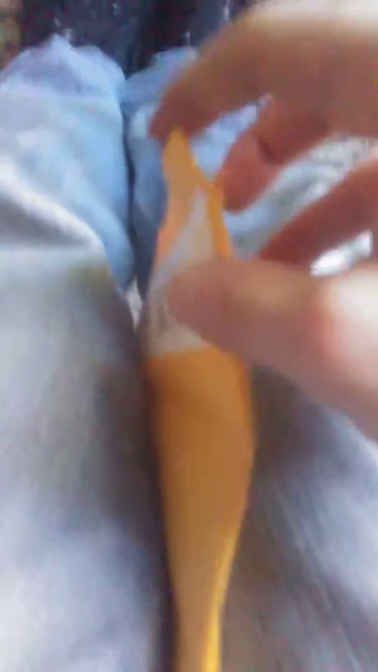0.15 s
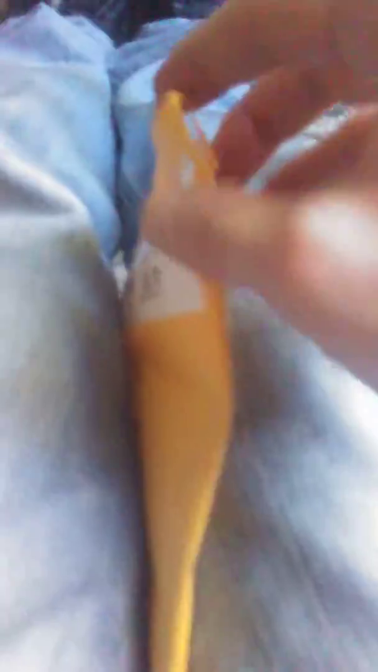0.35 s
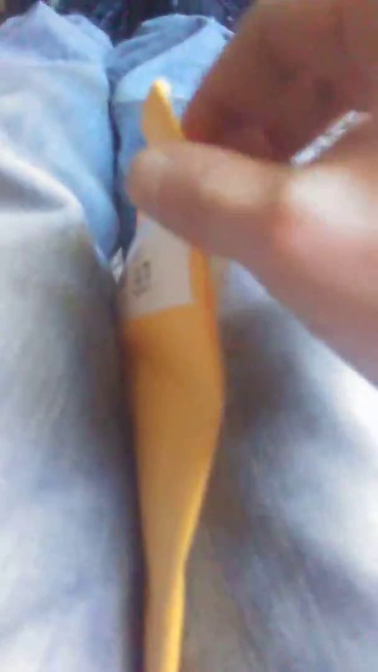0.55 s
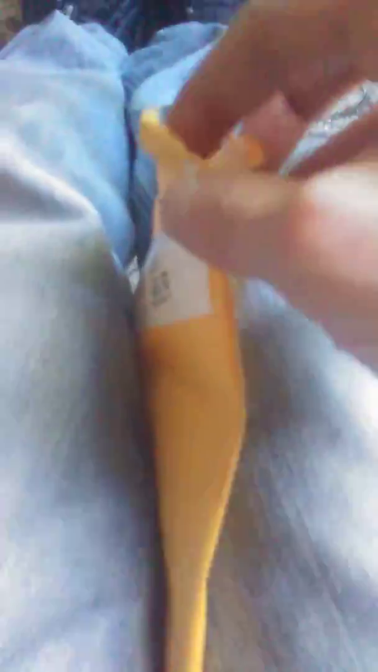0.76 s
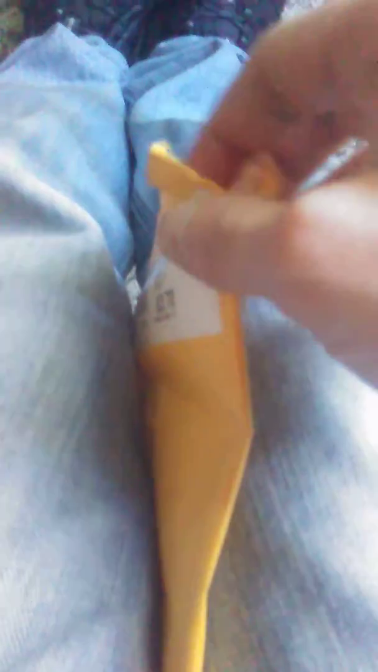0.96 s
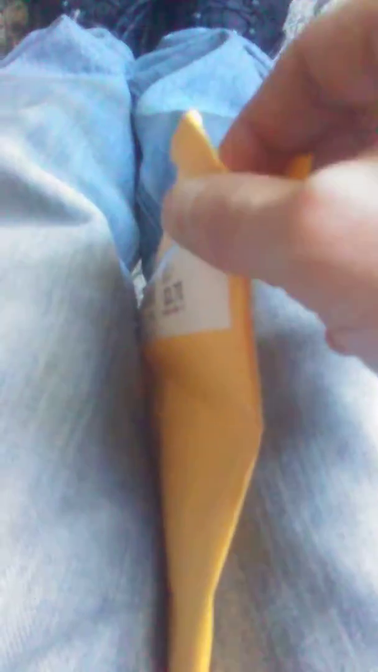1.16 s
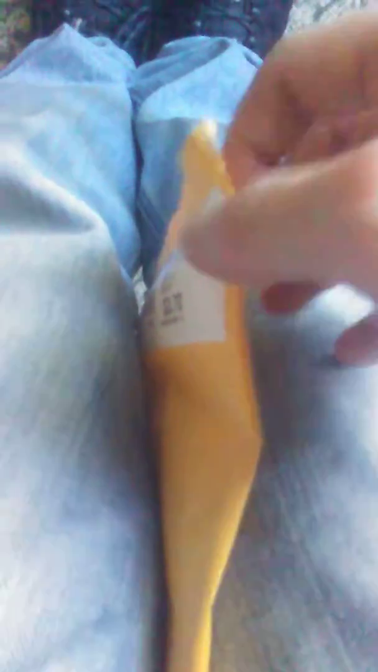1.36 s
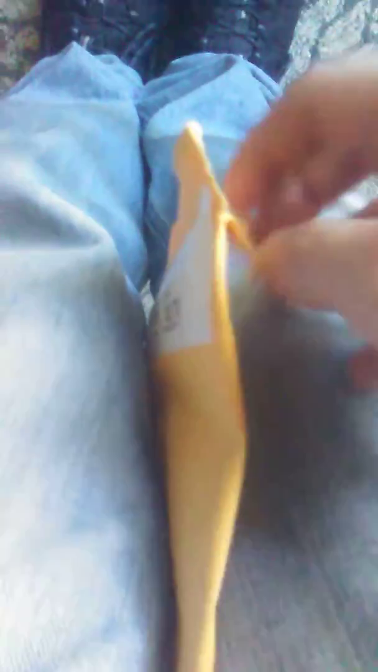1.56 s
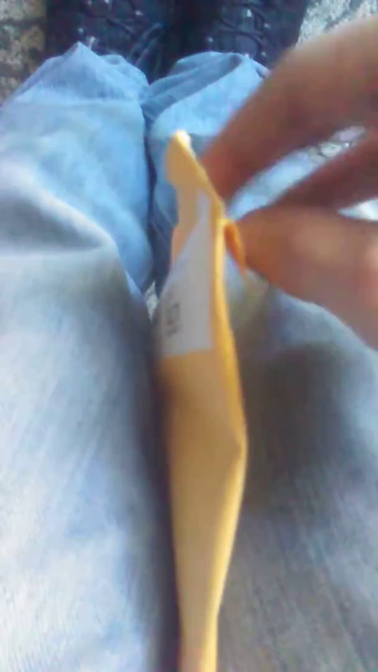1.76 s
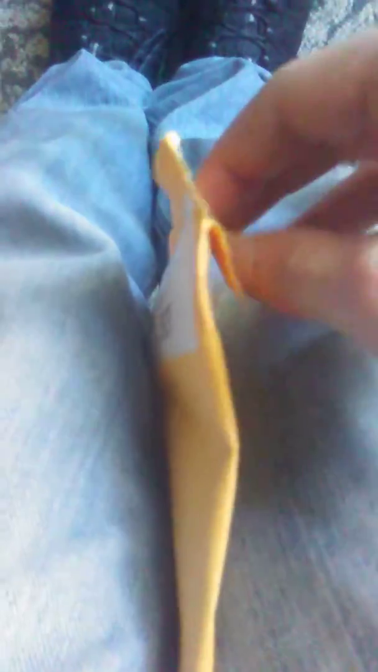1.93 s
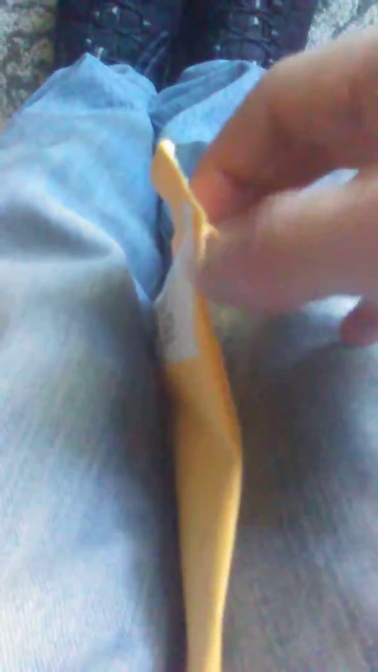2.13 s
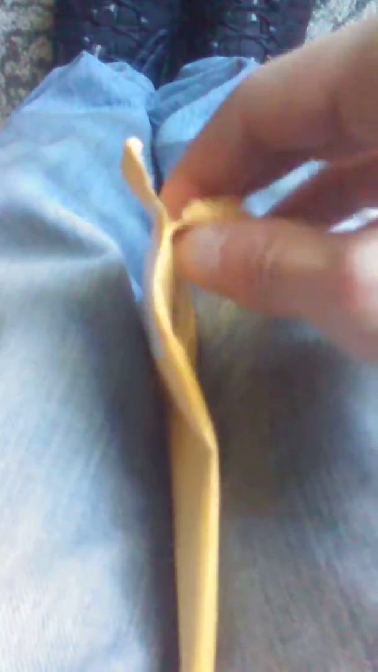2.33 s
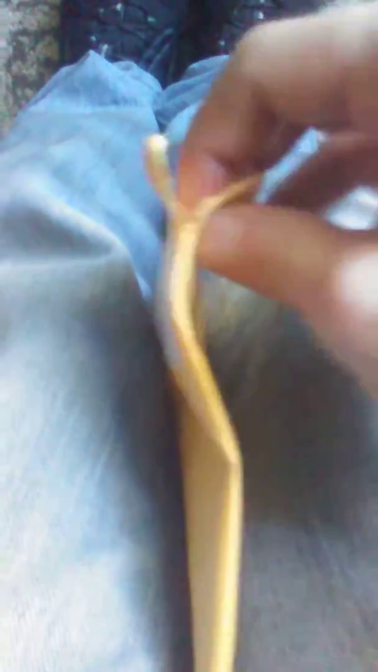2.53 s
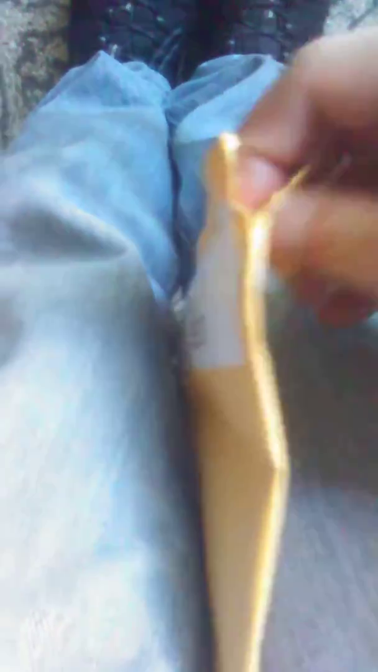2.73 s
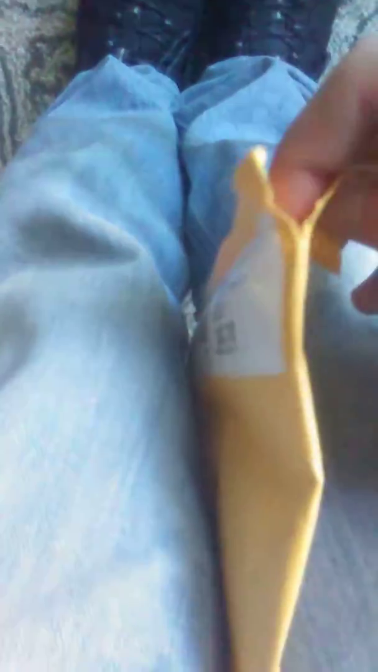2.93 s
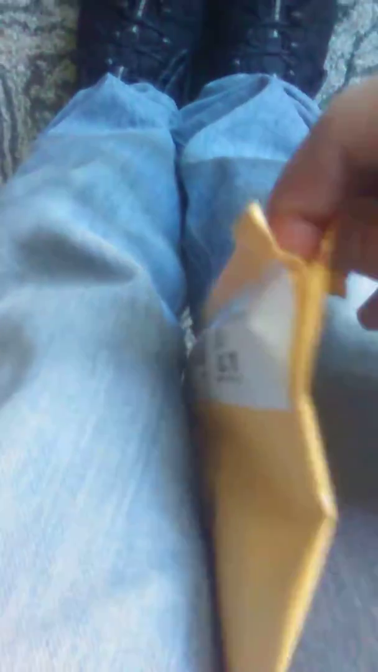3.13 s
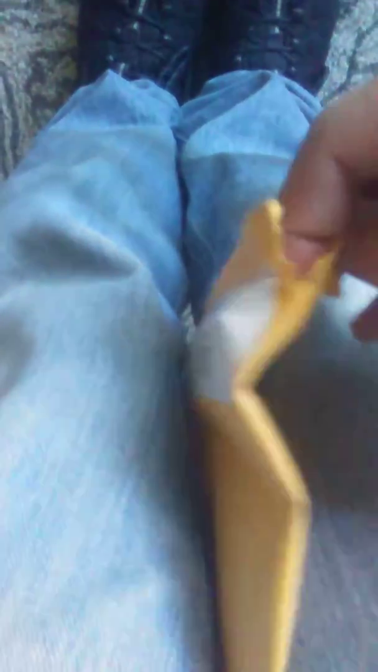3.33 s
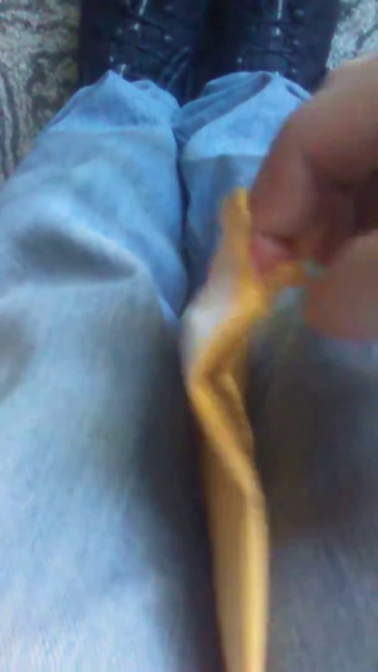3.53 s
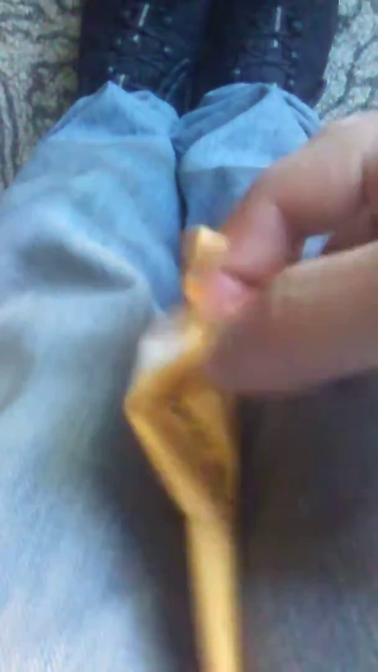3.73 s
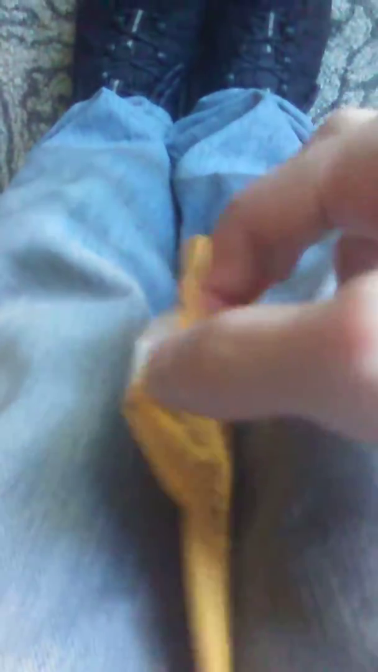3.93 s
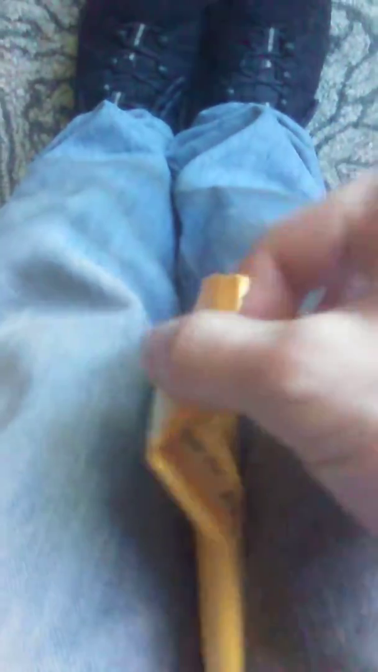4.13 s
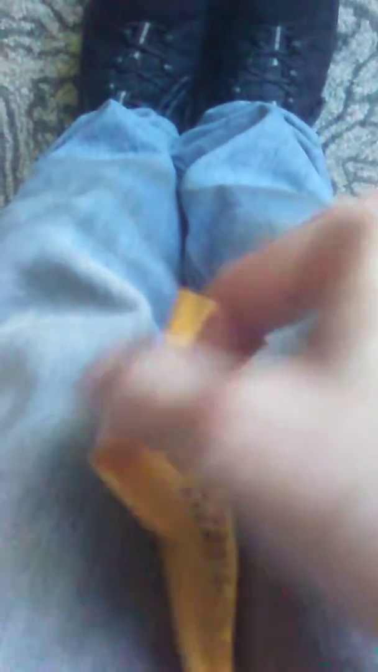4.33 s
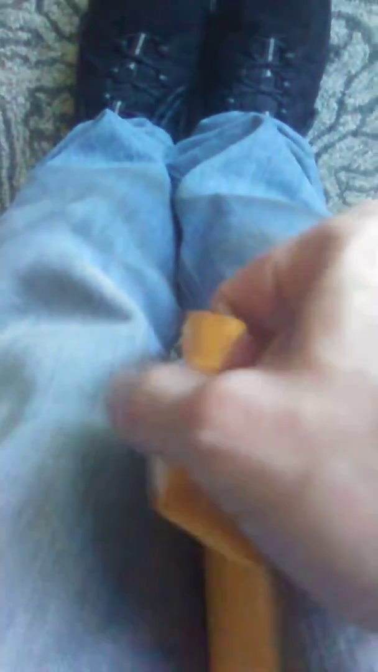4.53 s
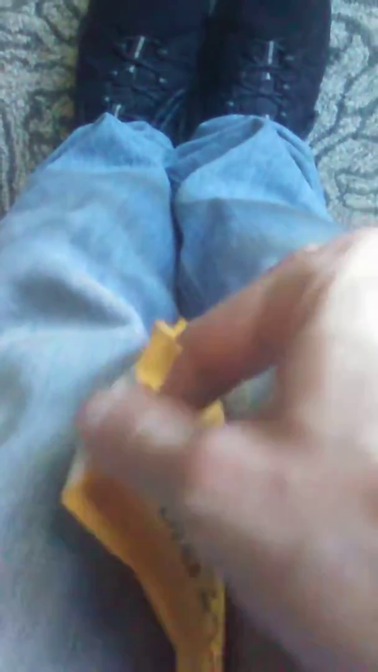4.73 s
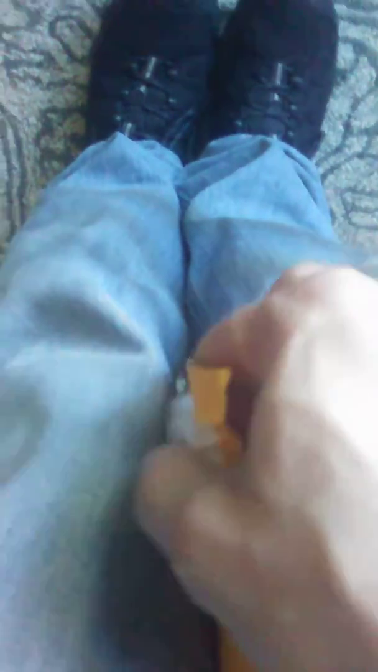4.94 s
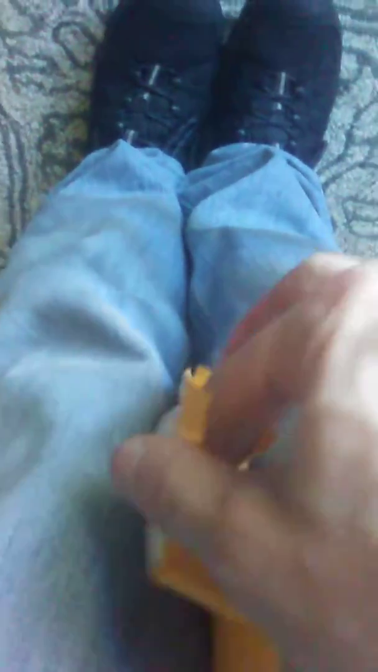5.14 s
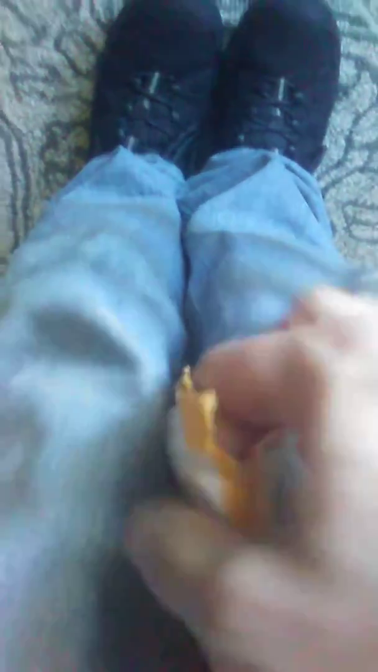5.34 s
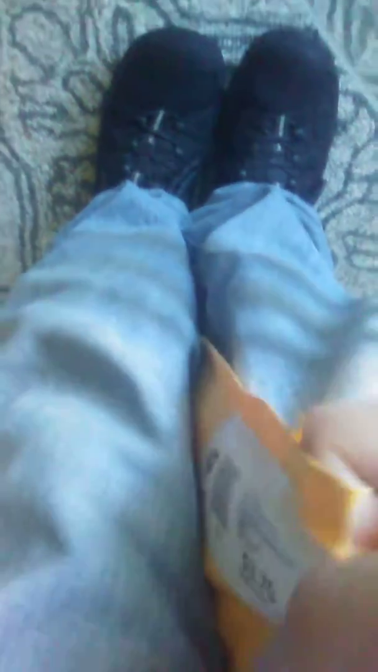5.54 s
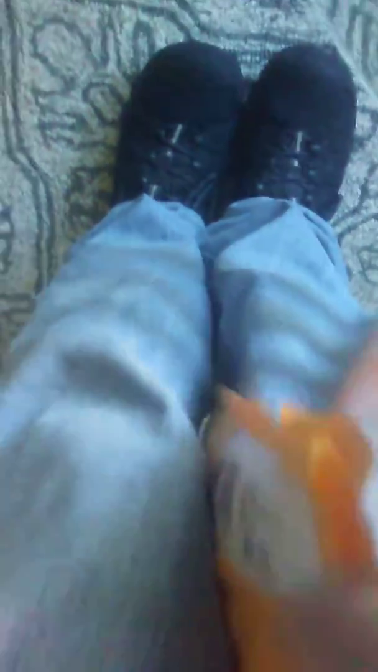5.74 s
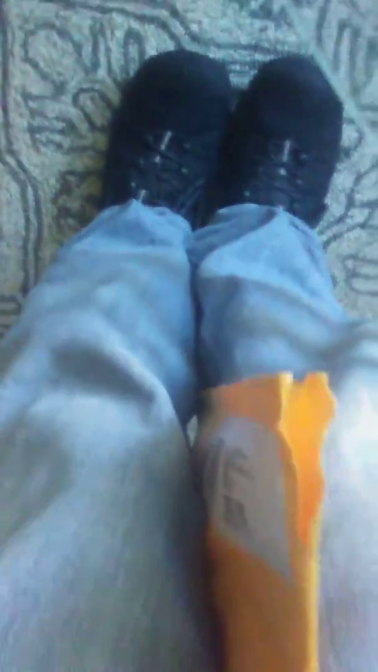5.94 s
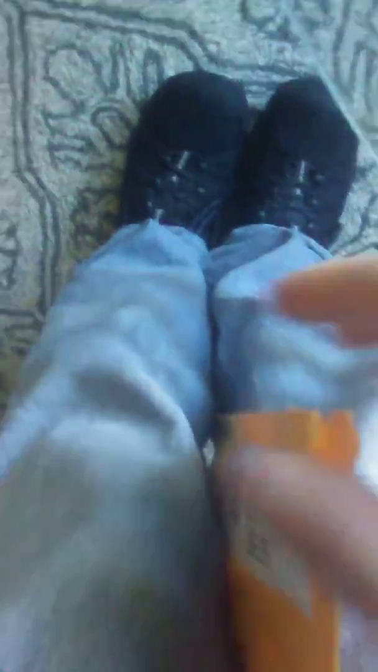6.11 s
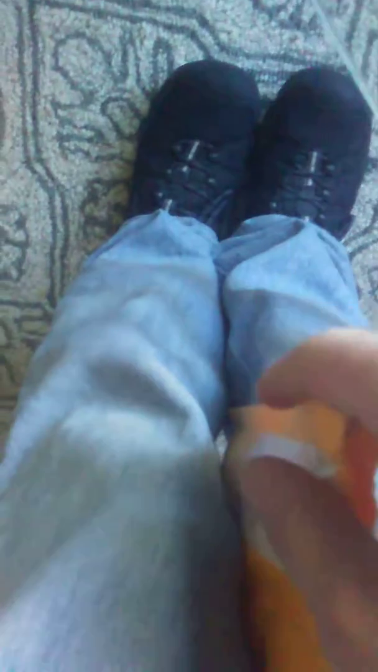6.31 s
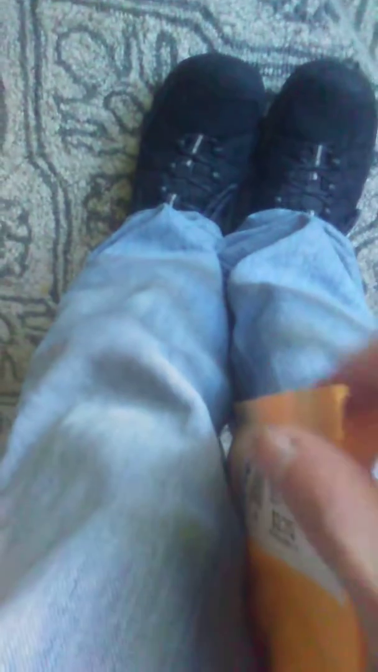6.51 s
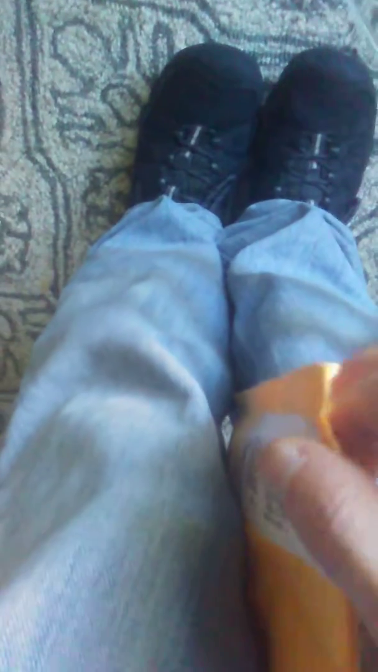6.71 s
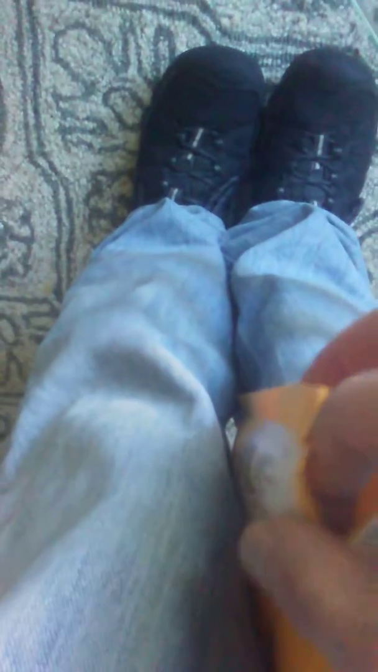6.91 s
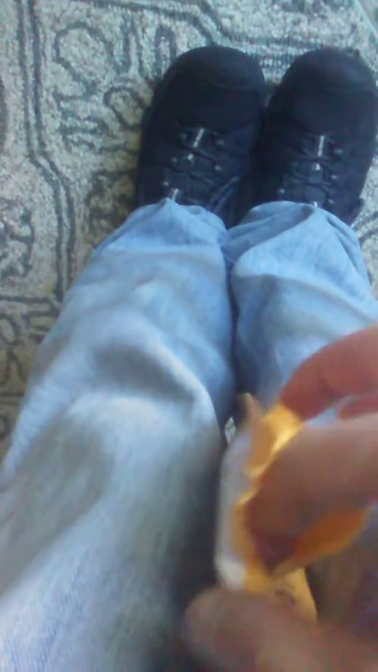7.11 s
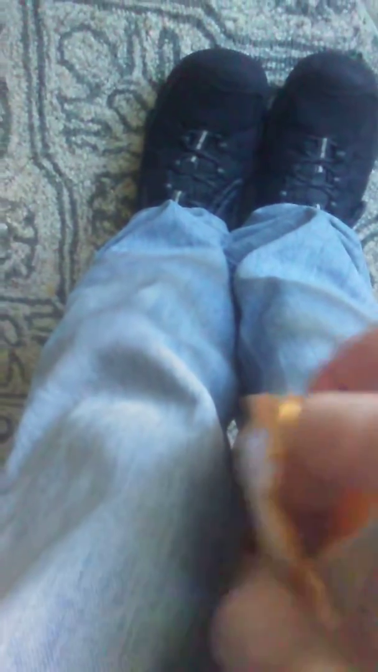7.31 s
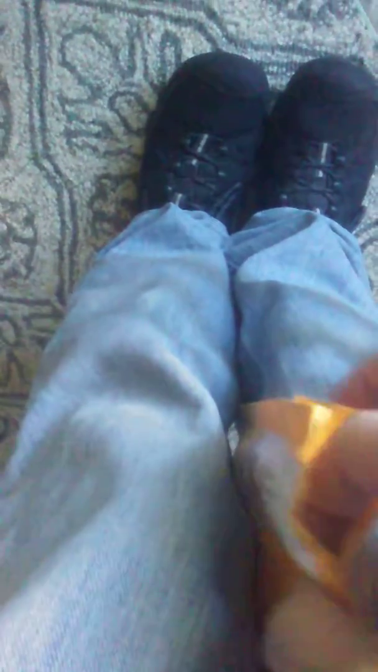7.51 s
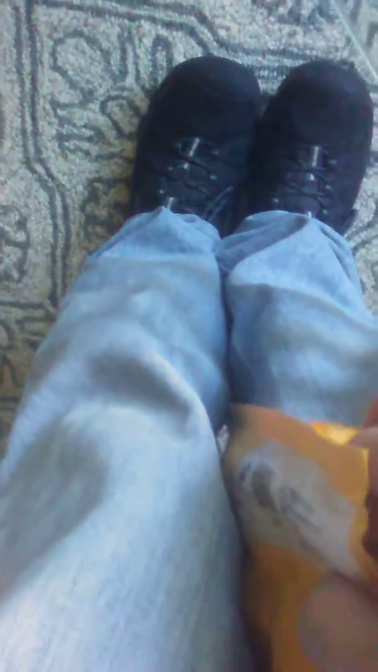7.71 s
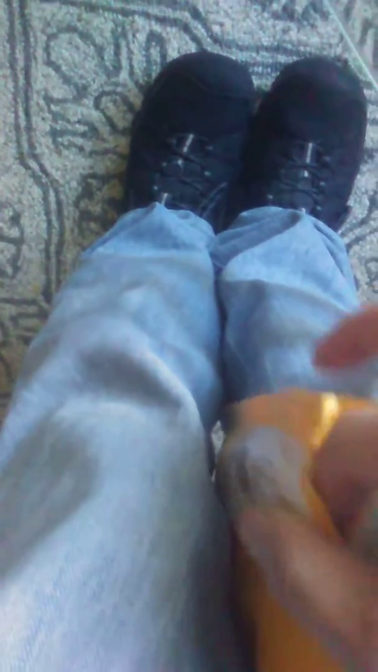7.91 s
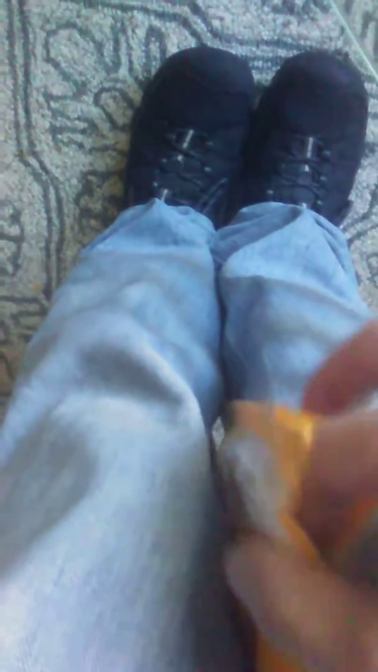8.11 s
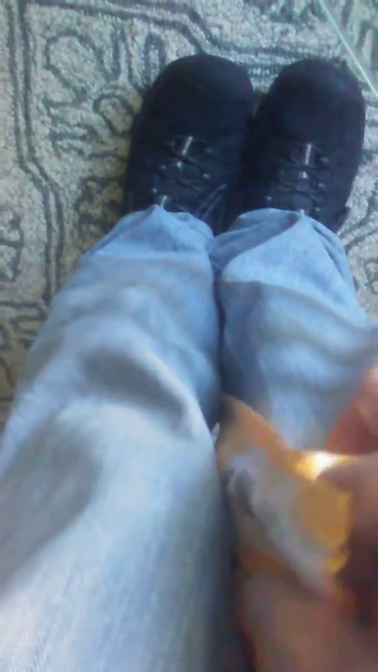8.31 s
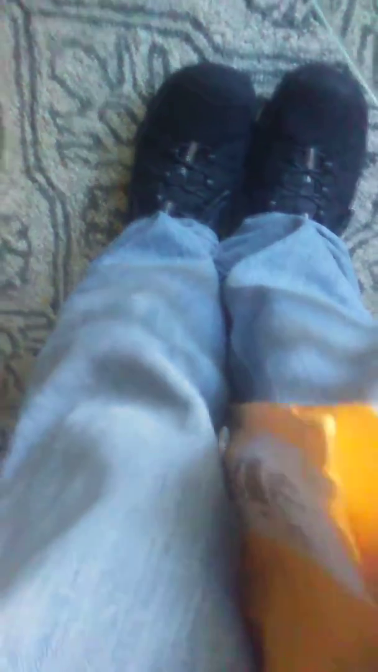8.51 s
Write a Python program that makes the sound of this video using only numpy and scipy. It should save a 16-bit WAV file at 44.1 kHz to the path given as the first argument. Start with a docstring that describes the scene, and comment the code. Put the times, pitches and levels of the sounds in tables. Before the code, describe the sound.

A stiff paper envelope is handled and torn close to a small microphone in a quiet small room with a faint steady noise floor. From 0 to 1.2 s there are only soft, short finger rubs and slight rustles. Around 1.2-1.5 s light clicks lead into a brighter crinkling burst, then it falls back to faint rasps and ticks until 2.2 s. Rubs strengthen to 2.9 s, and after a short dip, from 3.1 s the crackling becomes nearly continuous, with woody dry snaps clustering at 3.8-4.5 s. Rasping tears swell at 4.8 and 5.4 s, with sharp pops near 5.5 s. At 5.77 s one very hard snap overloads. It is almost quiet at 6.0-6.2 s, then smooth rubs follow, turning to crinkles and snaps from 6.8 s. Ripping strokes at 7.6 and 8.1 s lead to a final violent crack at 8.52 s.

```python
"""A paper mailing envelope is picked at by the flap, rubbed and torn open, close to a small microphone.
Each pull or rub of the fingers is a stroke: a rasp of tiny fibre breaks that starts quickly, holds and lets go,
with crinkles among the breaks, a fizz of treble above and the murmur of the hollow envelope below.
The stiff paper buckles in short snaps, each a pair of pitched rings with a brief crack; the hardest ones
overload the microphone. A quiet room adds faint reflections and a steady background noise."""
import sys
import numpy as np
from scipy import signal
from scipy.io import wavfile
from scipy.ndimage import uniform_filter1d

SR = 44100
rng = np.random.default_rng(int(sys.argv[2]) if len(sys.argv) > 2 else 0)


def to_wav(sig):
    """Store sig (one row per channel, or 1-D mono) as 16-bit WAV at the path in sys.argv[1].

    Samples outside -1..1 are clipped; the rate is SR.
    """
    pcm = np.clip(np.atleast_2d(sig), -1, 1) * 32767
    pcm = np.round(pcm).astype(np.int16)
    wavfile.write(sys.argv[1], SR, pcm.T)  # frames by channels


N = 377496
TIME = np.arange(N) / SR


def gain_of(db):
    """Decibels to amplitude."""
    return 10 ** (np.asarray(db) / 20)


def evened(x):
    """Scales to rms 1."""
    return x / np.sqrt(np.mean(x ** 2) + 1e-20)


def read(points, hz):
    """Reads a curve of (Hz, value) points on a log-frequency axis."""
    f, value = np.transpose(points)
    return np.interp(np.log(hz + 1), np.log(f), value)


def add(mix, start_s, sound):
    """Mixes a sound in at start_s seconds, cut off where the mix ends."""
    part = mix[max(round(start_s * SR), 0):][:len(sound)]
    part += sound[:len(part)]


def colour(x, points, size=4096):
    """Causal minimum-phase filter with the given spectrum, so that clicks keep their sharp front."""
    hz = abs(np.fft.fftfreq(size, 1 / SR))
    log_gain = np.log(gain_of(read(points, hz)))
    # the Hilbert transform of the log gain gives the phase
    taps = np.fft.ifft(np.exp(np.conj(signal.hilbert(log_gain)))).real
    return signal.oaconvolve(x, taps[:size // 2])[:len(x)]


def resonate(x, hz, q):
    """One damped resonance."""
    b, a = signal.iirpeak(hz, q, SR)
    return signal.lfilter(b, a, x)


def facet(hz, q, rise_s=0.0003, size=800):
    """A patch of paper flips over: its ringing builds in a moment and soon dies; energy 1."""
    t = TIME[:size]
    build = 1 - np.exp(-t / rise_s)
    decay = np.exp(-np.pi * hz * t / q)
    ring = np.sin(2 * np.pi * hz * t) * build * decay
    return ring / np.linalg.norm(ring)


def breaks(per_s, spread_db):
    """Fibres break at random: clicks of either sign, mostly small and a few large."""
    clicks = np.zeros(N)
    place, side, chance = rng.random((round(per_s * N / SR), 3)).T
    sizes = gain_of(-spread_db * np.log(chance + .03))  # the .03 limits the largest
    clicks[(place * N).astype(int)] = np.sign(side - .5) * sizes
    return clicks


def shift_colour(x, patchy_db, bright=0, size=512):
    """As the sheet bends its resonances wander; bright tilts the spectrum in dB per octave."""
    hz, t, z = signal.stft(x, SR, nperseg=size)
    # random gains, smoothed over neighbouring bands and moments
    blur = np.outer(np.hanning(7), np.hanning(11))
    patches = evened(signal.oaconvolve(rng.standard_normal(z.shape), blur, "same"))
    octaves = np.log2(np.clip(hz, 500, 5000) / 2000)[:, None]  # the tilt pivots at 2 kHz
    tilt_db = octaves * np.interp(t, TIME, bright * np.ones(N))
    z = z * gain_of(patchy_db * patches + tilt_db)
    return evened(signal.istft(z, nperseg=size)[1][:N])


def unevenness(surge, per_s, relax_s):
    """The paper sticks and gives way: each slip sets off a surge that dies away."""
    kicks = abs(breaks(per_s, spread_db=2.0))
    slips = signal.lfilter([1], [1, -np.exp(-1 / (relax_s * SR))], kicks)
    return evened(1 + surge * evened(slips))


def crinkles(per_s, spread_db, q, low_hz, high_hz, count=24):
    """Many small facets of different pitch buckle at random."""
    total = np.zeros(N)
    for hz in np.linspace(low_hz, high_hz, count):
        total += signal.oaconvolve(breaks(per_s / count, spread_db), facet(hz, q))[:N]
    return evened(total)


def strokes():
    """Each stroke grips fast and lets go exponentially; overlaps add in power and average tilt and crinkling."""
    # Pulls and rubs of the fingers. Each row: start in seconds, length in seconds, rasp level in dB,
    # swell from start to end in dB, fizz and hollow body in dB relative to the rasp,
    # brightness in dB per octave, crinkling in dB relative to the sliding rasp.
    # Levels are ahead of the trims in tearing().
    stroke_table = [(0.01, 0.0075, -45.5, -10, -18.5, -8.5, -3, -12),
                    (0.045, 0.038, -60.5, -2, -16, -3, -2, 5), (0.128, 0.12, -66, -1, -11.5, -0.5, -2, 6),
                    (0.33, 0.044, -62, -11, -14, -2, -3, -4), (0.368, 0.062, -56.5, -3, -13, -7, -4, -5.5),
                    (0.456, 0.041, -56.5, 3, -16.5, -16, -6, -12),
                    (0.608, 0.023, -53.5, -11, -11, -18, -4, -11),
                    (0.691, 0.14, -51, 1, -13.5, -12.5, -2, -13),
                    (0.898, 0.077, -55.5, 0, -12.5, -7, 0, -15), (0.991, 0.037, -55, 5, -11, -3, -2, -12),
                    (1.018, 0.055, -49, -2.5, -10.5, -6.5, -1, -10), (1.215, 0.1, -62, -8, -14, 2, -4, -7),
                    (1.362, 0.062, -53.5, -3, -14, -6.5, 0, -7), (1.411, 0.03, -41.5, -2, -9.5, -3, 1, -8),
                    (1.44, 0.012, -38.5, -2, -3.5, -18, 9, -1),
                    (1.477, 0.044, -40, -0.5, -8.5, -17, -1, -3.5),
                    (1.525, 0.15, -49.5, 0, -9.5, -9.5, -1, -7), (1.705, 0.024, -49.5, -10, -11, -7, 0, 2),
                    (1.823, 0.029, -57, 10, -7, -7, -1, -6), (1.922, 0.19, -70.5, -4, -12, -0.5, -3, 7),
                    (2.113, 0.025, -55, -1, -7, -4, 0.5, -5), (2.165, 0.065, -69, 20.5, -11, 5, 4, 6),
                    (2.257, 0.082, -46, 5.5, -10.5, -22, 0, -6), (2.338, 0.13, -53, 0, -8, -6, -1, -6.5),
                    (2.512, 0.076, -49.5, 3.5, -14, -14, -2, -9),
                    (2.608, 0.079, -55.5, 3, -12, -10, -1, 2.5), (2.698, 0.083, -48, 15, -12, -14, 5.5, -6),
                    (2.778, 0.11, -46, -3.5, -11.5, -14, 1, -3), (2.982, 0.14, -65, 1.5, -16, 6, 0, 1.5),
                    (3.115, 0.091, -53, -11, -13, -7.5, 4, -3),
                    (3.181, 0.089, -43.5, 9, -9.5, -7, -1.5, -1),
                    (3.287, 0.21, -46.5, 5.5, -9.5, -7.5, 4, -1.5),
                    (3.51, 0.24, -49, 3, -11.5, -10, 1, -3.5),
                    (3.751, 0.053, -42.5, 11.5, -11, -14, 2, -4.5),
                    (3.822, 0.13, -46, 2, -11, -10.5, 2.5, -0.5),
                    (3.987, 0.1, -44.5, 8.5, -9.5, -11.5, 3, -1.5),
                    (4.112, 0.16, -48, 9, -11.5, -8, -4, -8.5),
                    (4.286, 0.18, -42.5, 7.5, -11, -15, -1, -1.5),
                    (4.464, 0.094, -46, 0.5, -9, -12.5, 4, 0),
                    (4.617, 0.048, -43.5, 10, -12.5, -16, -2.5, -8),
                    (4.67, 0.19, -46.5, 5.5, -10.5, -19, -1.5, -7.5),
                    (4.823, 0.085, -36.5, 5, -12, -18, -0.5, -6),
                    (4.917, 0.1, -47.5, -3, -8.5, -7.5, 1, -3), (5.033, 0.14, -51.5, 3, -11, -7, -3.5, -9),
                    (5.105, 0.11, -43.5, 6.5, -12, -13.5, -1.5, -1.5),
                    (5.22, 0.17, -43.5, 13, -10, -13, -1, -7), (5.392, 0.15, -37, 0, -8, -11, 1.5, -8),
                    (5.556, 0.22, -47.5, -5.5, -7.5, -16, -2, -5.5),
                    (5.757, 0.064, -37, -14.5, -16, -7.5, 1.5, -3.5),
                    (5.82, 0.078, -51, -8.5, -7, -23, 1.5, -7.5),
                    (5.901, 0.12, -52.5, -1, -7, -1.5, 4.5, -2.5),
                    (6.035, 0.066, -64.5, -9.5, -7, -7, 3, 1), (6.118, 0.04, -60, 2.5, -6, -3.5, 7, 3),
                    (6.262, 0.1, -44, -1, -14.5, -18.5, -1, -20.5),
                    (6.405, 0.11, -48, 3, -14, -16, -1.5, -19),
                    (6.529, 0.082, -48, -0.5, -13, -9.5, -2, -18),
                    (6.659, 0.068, -49.5, 1, -12.5, -10.5, 0.5, -10),
                    (6.743, 0.13, -48.5, 4, -8, -9.5, 1, -9), (6.832, 0.045, -42, -1, -9, -6.5, 3.5, -2.5),
                    (6.88, 0.15, -48.5, 0, -9.5, -8.5, 5, -3.5),
                    (6.958, 0.21, -44.5, 6.5, -9.5, -15.5, 5, -4.5),
                    (7.184, 0.046, -50, -2, -8.5, -10, 3, -19),
                    (7.239, 0.052, -42.5, -3, -14, -15.5, 0, -7.5),
                    (7.306, 0.073, -42, 4, -12.5, -13, 1.5, -7.5),
                    (7.386, 0.075, -44.5, -1, -8, -10.5, 2, -5), (7.477, 0.12, -48, 7, -9, -8.5, 2, 1.5),
                    (7.604, 0.13, -39, 2, -9.5, -19.5, 0.5, -3.5),
                    (7.746, 0.26, -46.5, 4.5, -9.5, -12, 0.5, -12),
                    (7.962, 0.16, -47.5, -1, -8.5, -16, 5.5, -5.5),
                    (8.13, 0.077, -37.5, 5.5, -11.5, -22, -0.5, -4.5),
                    (8.216, 0.13, -46.5, -5.5, -6, -13, 2, -5.5), (8.355, 0.13, -55, 2, -6.5, -9, 0, -2),
                    (8.444, 0.065, -44, 6, -10, -18, 4, -3), (8.522, 0.038, -36, 9, -6, -5, 5, -3)]
    # on release the sheet and the air in the envelope settle at nearly the same pace
    attack_s, release_s, body_release_s = 0.0032, 0.0087, 0.0089
    # the creases go on settling for a moment, louder the more the stroke crinkled (share: dB per dB)
    settling_db, settling_share, settling_s = -9, .35, 0.036
    # the held envelope never quite rests
    resting_db, resting_body_db = -82, -82

    rasp, fizz, body, bright, crinkle = np.zeros((5, N))
    for start, length, rasp_db, swell_db, fizz_db, body_db, tilt, crinkle_db in stroke_table:
        t = TIME[:int((length + .15) * SR)]  # room for the release
        after = np.maximum(t - length, 0)
        swell = swell_db * (np.minimum(t / length, 1) - .5)
        held = gain_of(rasp_db + swell) * np.minimum(t / attack_s, 1)
        settling = gain_of(settling_db + settling_share * crinkle_db) * np.exp(-after / settling_s)
        power = (held * np.maximum(np.exp(-after / release_s), settling)) ** 2
        add(rasp, start, power)
        add(fizz, start, power * gain_of(fizz_db) ** 2)
        add(body, start, (held * gain_of(body_db) * np.exp(-after / body_release_s)) ** 2)
        # weighted by power, so the loudest stroke decides
        add(bright, start, power * tilt)
        add(crinkle, start, power * crinkle_db)
    rasp = rasp + gain_of(resting_db) ** 2
    body = body + gain_of(resting_body_db) ** 2
    return np.sqrt(rasp), np.sqrt(fizz), np.sqrt(body), bright / rasp, gain_of(crinkle / rasp)


def tearing():
    """Dense fibre breaks rasp in the sheet, with crinkles among them, fizz above and the hollow body below."""
    # Spectra of the fibre rasp, the fizz and the hollow body.
    # Each row: frequency in Hz, relative density in dB per Hz.
    rasp_spectrum = [(120, -34.5), (300, -16), (550, -7.5), (850, -2), (1300, 0), (1650, -0.5), (2100, 4.5),
                     (2700, -2.5), (3800, -1), (4600, -23), (6500, -28.5), (10000, -44)]
    fizz_spectrum = [(2000, -41.5), (4000, -6.5), (5500, -0.5), (7000, 4), (9000, 3), (11000, 3.5),
                     (13000, -1), (16000, -8)]
    body_spectrum = [(40, -24.5), (100, -20), (160, -9.5), (220, -1.5), (280, 0), (370, 1.5), (500, -3.5),
                     (700, -7.5), (1100, -23.5), (2500, -56)]
    rasp_level, fizz_level, body_level, bright, crinkle = strokes()

    slips = unevenness(surge=0.94 * crinkle, per_s=170, relax_s=0.0037)
    # evened over 2600 samples (59 ms), so the strokes alone set the slower level
    slips /= np.sqrt(uniform_filter1d(slips ** 2, size=2600))

    fibres = colour(breaks(per_s=6000, spread_db=3.5), rasp_spectrum)
    sliding = shift_colour(fibres, patchy_db=2.5, bright=bright)
    creases = crinkles(per_s=520, spread_db=5.0, q=2.6, low_hz=840, high_hz=4120)
    rasp = (sliding + crinkle * creases) / np.hypot(1, crinkle)

    # crinkling also snaps single fibres, heard as fine ticks
    ticking = 1.1 * crinkle
    hiss = shift_colour(colour(breaks(per_s=7100, spread_db=6.0), fizz_spectrum), patchy_db=1.5)
    ticks = crinkles(per_s=230, spread_db=4.0, q=1.6, low_hz=6300, high_hz=9870)
    fizz = (hiss + ticking * ticks) / np.hypot(1, ticking)

    murmur = shift_colour(colour(rng.standard_normal(N), body_spectrum), patchy_db=1.1)
    # small creaks of the walls also knock on the air pocket inside
    knocks = evened(resonate(breaks(per_s=140, spread_db=3.0), hz=287, q=3.2))
    body = evened(murmur + gain_of(-4) * knocks)
    body *= unevenness(surge=0.32, per_s=240, relax_s=0.0069)

    sheet = gain_of(-0.48) * rasp_level * rasp + gain_of(5.0) * fizz_level * fizz
    return slips * sheet + gain_of(0.94) * body_level * body


def low_cut(x, hz):
    """A small patch of paper radiates little bass."""
    return signal.lfilter(*signal.butter(1, hz, "highpass", fs=SR), x)


def snaps():
    """Each buckle rings two modes of a facet, pushes the air in the envelope and lets out a brief crack."""
    # Paper buckling. Each row: time in seconds, pitch in Hz, then the levels of low ring, overtone and crack
    # in dB rms over 1 ms, ahead of the low cut and the trim in scene().
    snap_table = [(0.138, 1100, -58, -51, -66), (1.2267, 1160, -36, -39, -55),
                  (1.2463, 1250, -37, -46, -62), (1.27, 1280, -31, -39.5, -54),
                  (1.294, 1210, -43, -51, -68), (1.3653, 1150, -30, -36.5, -54),
                  (1.4184, 590, -34, -37, -55), (1.447, 1200, -27.5, -38, -48), (1.481, 820, -33, -39, -58),
                  (1.7194, 990, -41.5, -42, -36), (1.7448, 900, -45, -45, -61),
                  (1.8327, 1090, -66, -43, -60), (1.8579, 1530, -44, -58, -47),
                  (1.943, 1400, -62, -50, -56), (1.971, 1100, -60, -47, -62),
                  (1.9906, 1290, -58, -45.5, -49), (2.1394, 900, -55, -45.5, -57),
                  (2.1715, 1100, -69, -41, -68), (2.2268, 930, -57, -45.5, -68),
                  (2.5385, 780, -31.5, -42, -60), (2.8528, 1420, -47, -31, -58),
                  (2.8633, 930, -52, -32.5, -58), (3.1377, 890, -35, -54, -58),
                  (3.2564, 830, -23, -26, -48), (3.2987, 1000, -27.5, -42, -56),
                  (3.3292, 603, -29.5, -29, -56), (3.4206, 1200, -29, -32, -58),
                  (3.4797, 1140, -31, -36, -53), (3.7849, 716, -24, -33, -54),
                  (3.8252, 850, -19.5, -23.5, -39), (3.8906, 970, -24, -45, -56),
                  (4.0195, 1050, -23, -37, -48), (4.0628, 940, -18, -37, -54),
                  (4.2289, 915, -22.5, -21.5, -58), (4.3052, 880, -14, -18.5, -39),
                  (4.3703, 950, -20, -32, -50), (4.3772, 1140, -18.5, -20.5, -24),
                  (4.443, 730, -25, -30.5, -30), (4.502, 1520, -30, -45, -58), (4.516, 1360, -30, -48, -58),
                  (4.529, 1510, -29, -54, -53), (4.9399, 1420, -48, -30.5, -60),
                  (5.4083, 560, -20.5, -24.5, -52), (5.4167, 1100, -25, -24, -51),
                  (5.4603, 700, -26, -28.5, -49.5), (5.4796, 640, -20, -9.5, -29),
                  (5.493, 875, -33.5, -28, -58), (5.5302, 790, -33, -20.5, -21.5),
                  (5.7656, 665, -7.5, -3, -3), (5.7693, 417, -17, -21, -26),
                  (6.0146, 1400, -58.5, -36.5, -65.5), (6.185, 1300, -58, -48.5, -62.5),
                  (6.6936, 750, -39, -28.5, -36), (6.9751, 1140, -20.5, -19, -35),
                  (7.096, 624, -28.5, -43, -58), (7.1507, 785, -21, -33, -46), (7.209, 1400, -54, -39, -33),
                  (7.5, 1150, -54, -29.5, -47), (7.5828, 1500, -35, -37, -57),
                  (7.7047, 550, -19.5, -20.5, -51), (8.2268, 526, -23.5, -34.5, -56),
                  (8.4721, 820, -25, -21, -31), (8.4864, 1520, -18.5, -15, -38),
                  (8.5192, 526, -6.5, -8.5, -12.5), (8.5204, 1930, -12, -2, -23),
                  (8.522, 880, -10.5, -28, -30)]
    # every facet rings alike: its overtone lies at a fixed ratio above its pitch
    overtone_ratio, low_q, overtone_q = 2.5, 2.4, 2.2
    # a hard buckle frees a larger patch, which rings longer: extra share of overtone Q at amplitude 1
    freeing = 1.75
    push_db, push_hz = -25, 300  # air push, dB relative to the low ring
    shiver_db, shiver_s = -7, 0.0013  # dB relative to the ring
    crack_s, lead_s = 0.0012, 0.00016  # decay of the crack; each snap starts this much ahead

    out, t = np.zeros(N), TIME[:800]
    for start, hz, low_db, overtone_db, crack_db in snap_table:
        low, overtone = gain_of(low_db), gain_of(overtone_db)
        freed_q = overtone_q * (1 + freeing * overtone)
        ring = low * facet(hz, low_q) - overtone * facet(overtone_ratio * hz, freed_q)
        ring += gain_of(low_db + push_db) * facet(push_hz, 7.6, rise_s=0.0017)
        # bending waves come back from folds and edges, so the sheet shivers on
        returns = rng.standard_normal(len(t)) * np.sqrt(t) * np.exp(-t / shiver_s)
        returns /= np.linalg.norm(returns)
        ring += gain_of(shiver_db) * np.convolve(ring, returns)[:len(t)]
        crack = resonate(rng.standard_normal(len(t)) * np.exp(-t / crack_s), hz=9000, q=.6)
        crack /= np.linalg.norm(crack)
        add(out, start - lead_s, ring + gain_of(crack_db) * crack)
    return low_cut(out, hz=190) * np.sqrt(SR / 1000)  # energy to rms over 1 ms


def room(x, start_s=.002):
    """Sparse reflections of a small furnished room; the treble dies first."""
    # Room decay. Each row: frequency in Hz, time to fall by 60 dB in seconds.
    decay_times = [(200, 0.4), (2000, 0.16), (6000, .14), (14000, .09)]
    size = SR // 2
    present = rng.random(size) < 3000 / SR  # about 3000 reflections per second
    taps = rng.standard_normal(size) * present * (TIME[:size] > start_s)
    hz, t, z = signal.stft(taps, SR, nperseg=256)
    decay_db = -60 * t / read(decay_times, hz)[:, None]
    tail = signal.istft(z * gain_of(decay_db), nperseg=256)[1]
    return signal.oaconvolve(x, tail / np.linalg.norm(tail))[:N]


def scene():
    """The envelope close by, in a faint room."""
    paper = tearing() + gain_of(-0.5) * snaps()
    return (paper + gain_of(-19.5) * room(paper))[None]


def record(dry):
    """Microphone colour over steady room noise, soft lopsided overload at high level, then the band limit."""
    # Steady background noise. Each row: frequency in Hz, relative density in dB per Hz.
    noise_spectrum = [(20, -26.5), (42, -12.5), (62, 3.5), (110, -13.5), (250, -10.5), (500, -6.5),
                      (1500, -17.5), (3500, -17), (5000, -28.5), (9000, -23.5), (16000, -23.5)]
    # Colour of the microphone, with the deep notch of its port. Each row: frequency in Hz, gain in dB.
    microphone_response = [(30, -8.5), (120, -11), (200, -3.5), (3000, 1), (4050, 1), (4550, -18),
                           (5200, -10), (6000, -3.5), (7200, -0.5), (8800, -1.5), (10500, -9), (12500, -13),
                           (14800, -7), (16000, -7)]
    ceiling, lopsided, edge_hz = .92, 0.058, 16000

    quiet = gain_of(-70.5) * evened(colour(rng.standard_normal(N), noise_spectrum))
    heard = colour(dry[0], microphone_response) + quiet
    heard = ceiling * np.tanh(heard / ceiling)
    heard = heard - lopsided * heard ** 2
    band_limit = signal.firwin(511, edge_hz, window=("kaiser", 9), fs=SR)
    return signal.oaconvolve(heard, band_limit, "same")[None]


dry = scene()
out = record(dry)
to_wav(out)
```